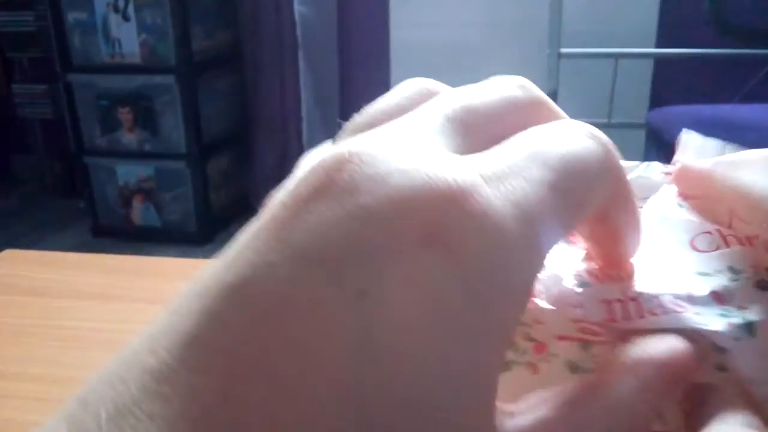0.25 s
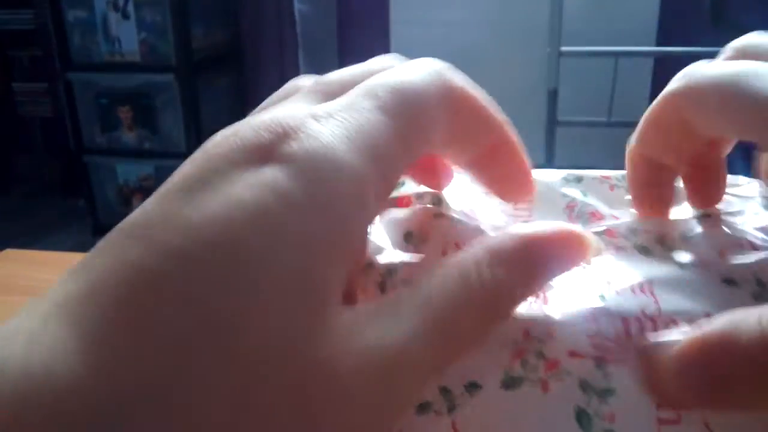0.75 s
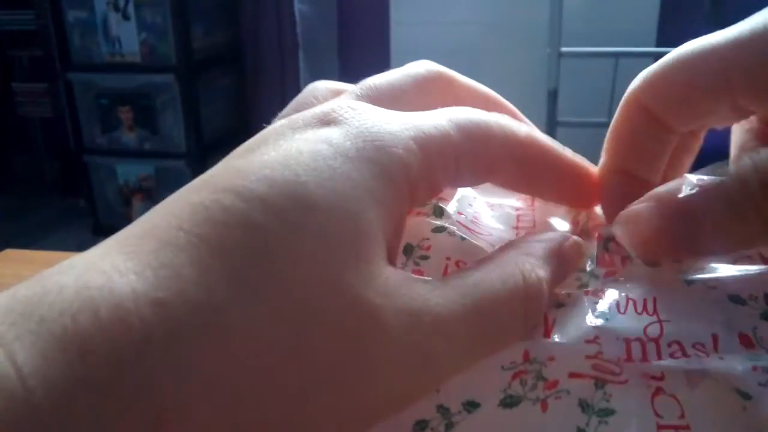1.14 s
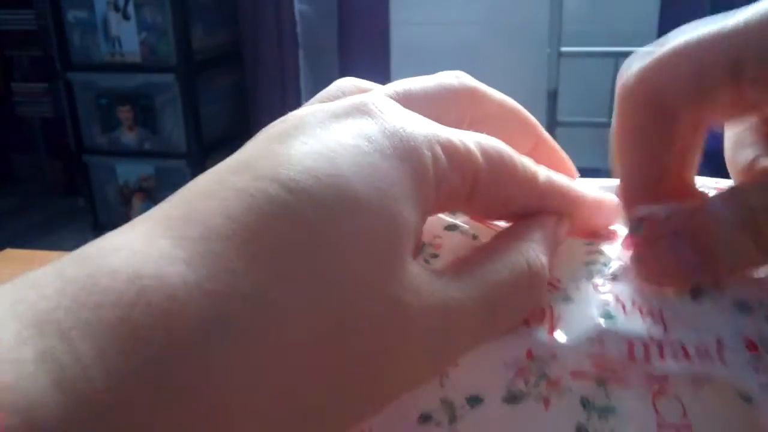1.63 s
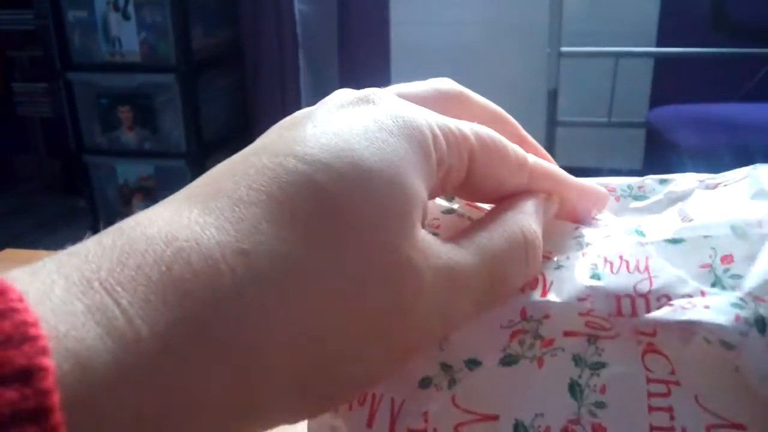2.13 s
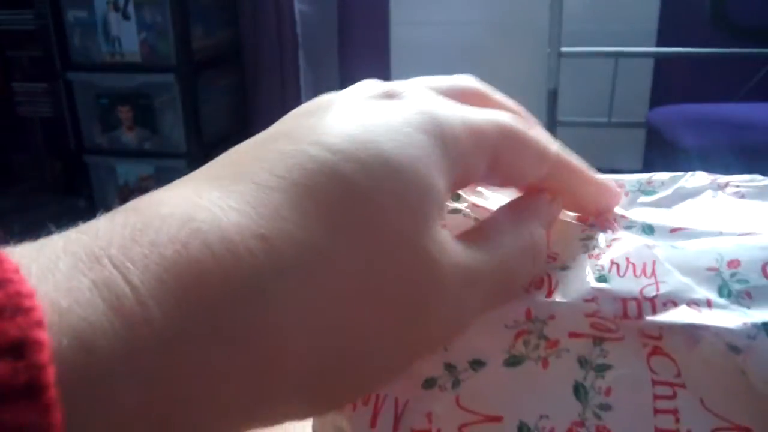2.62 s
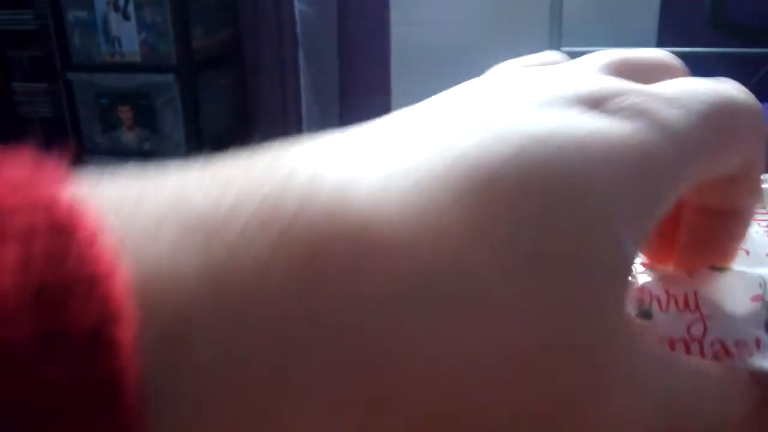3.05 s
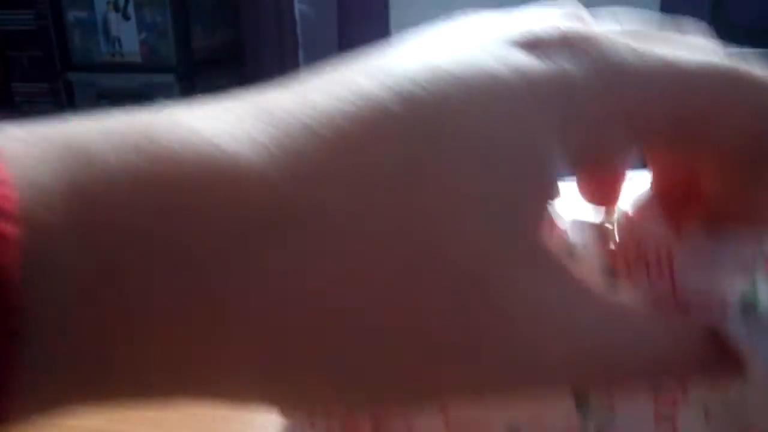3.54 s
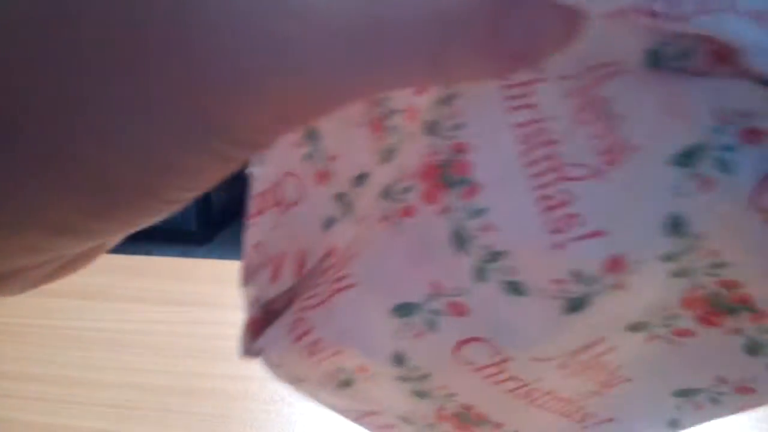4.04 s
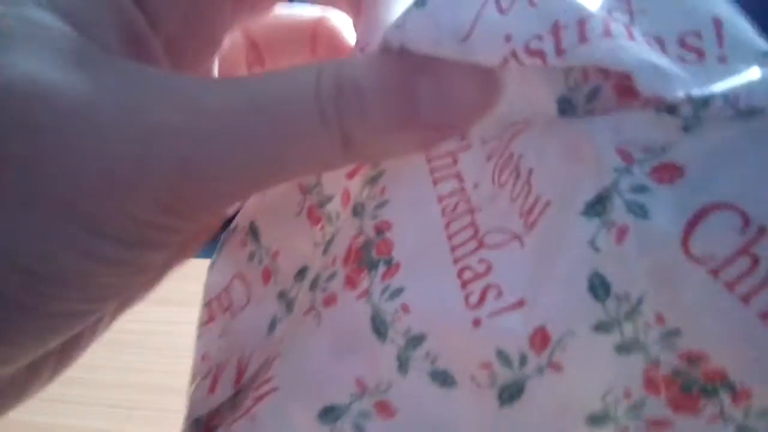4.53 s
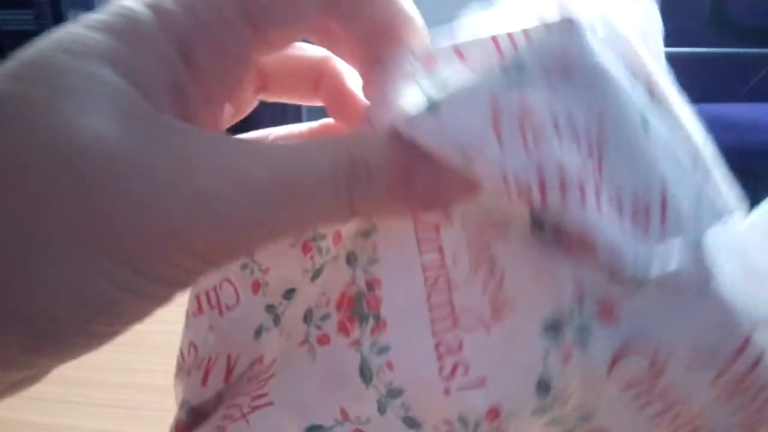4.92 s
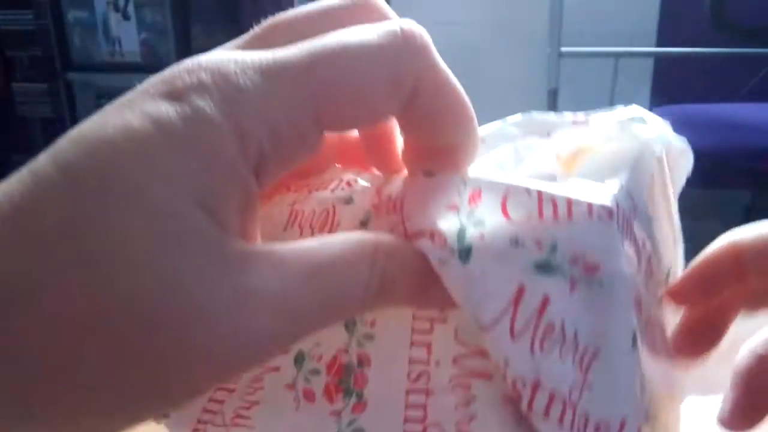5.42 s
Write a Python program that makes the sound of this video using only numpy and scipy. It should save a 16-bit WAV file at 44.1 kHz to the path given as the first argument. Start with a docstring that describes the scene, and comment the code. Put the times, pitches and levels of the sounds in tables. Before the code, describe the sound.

Thin glossy wrapping paper crackles and snaps in picking fingers, swells into loud rasping crinkles as it is pulled open, then fades to faint ticks.

```python
"""Hands pick open a small present in thin glossy wrapping paper, close to the microphone in a furnished room.
Creases snap through in milliseconds: noise bursts and damped sines excite facets, sheet and hollow.
Pulling and peeling crowd tiny buckles into rasping bursts: random impulses set the power of filtered noise.
Fingers bump, tap, drag and slide by shaped noise and decaying sines, over a faint hush of filtered noise.
Scattered echoes follow every sound of the wrap, and the loudest snaps overload the microphone."""
import sys
import numpy as np
from scipy import signal
from scipy.fft import rfft, irfft
from scipy.io import wavfile
from scipy.ndimage import uniform_filter1d

SR = 44100
rng = np.random.default_rng(int(sys.argv[2]) if len(sys.argv) > 2 else 0)


def master(y):
    """Save y as 16-bit WAV."""
    cut = np.clip(np.atleast_2d(y).T, -1, 1)
    pcm = np.round(cut * 32767)  # scale
    wavfile.write(sys.argv[1], SR, pcm.astype(np.int16))


N = 250263
TIME = np.arange(N) / SR


def undb(db):
    """Amplitude law: 20 dB is a tenfold gain."""
    return 10 ** (np.asarray(db) / 20)


def unit(x):
    """Normalisation: scale to rms 1."""
    return x / np.sqrt(np.mean(x ** 2) + 1e-20)


def add(track, s, sound):
    """Superposition: mix a sound into the track from time s."""
    i = int(np.clip(s * SR, 0, N - 1))
    track[i:i + len(sound)] += sound[:N - i]


def response(points, size=2048):
    """Minimum phase: the causal, unit-energy impulse response of a (Hz, dB) spectrum."""
    hz, db = np.transpose(points)
    log_hz = np.log(np.fft.rfftfreq(size, 1 / SR) + 1)
    gain = undb(np.interp(log_hz, np.log(hz), db))
    # folding the cepstrum onto positive times makes the response causal
    cepstrum = irfft(np.log(gain))
    cepstrum[1:size // 2] *= 2
    cepstrum[size // 2 + 1:] = 0
    h = irfft(np.exp(rfft(cepstrum)))[:size // 2]
    return h / np.linalg.norm(h)


def ringing(modes, size=2048):
    """Modal superposition: damped sines, wider modes dying sooner, with unit energy in all."""
    t = np.arange(size) / SR
    h = np.zeros(size)
    for k, (hz, width, db) in enumerate(modes):
        decay = np.exp(-np.pi * width * t)
        sign = (-1) ** k  # neighbours alternate in sign
        h += sign * undb(db) * width * decay * np.sin(2 * np.pi * hz * t)
    return h / np.linalg.norm(h)


def through(x, h):
    """Linear filtering: convolve a sound with an impulse response."""
    return signal.fftconvolve(x, h)[:len(x)]


def burst(decay_s, size=2048):
    """Impulsive excitation: noise that starts at once and decays exponentially."""
    return rng.standard_normal(size) * np.exp(-np.arange(size) / SR / decay_s)


def buckles(rate, spread_db, grain_s, rub, window=1700):
    """Shot noise: power of random, uneven buckles, its local mean held near 1, over smooth rubbing."""
    sizes = undb(spread_db * np.minimum(rng.exponential(size=N), 4))
    hits = (rng.random(N) < rate / SR) * sizes ** 2
    power = signal.lfilter([1], [1, -np.exp(-1 / (grain_s * SR))], hits)
    local = uniform_filter1d(uniform_filter1d(power, size=window), size=window)
    return power / (np.abs(local) + 0.0014 * power.mean()) + rub


# spectrum of the room's hush: frequency_hz, relative_level_db
HUSH_SPECTRUM = [(30, -7.5), (150, 4), (700, -2.5), (2000, 0.5), (6000, -6), (7600, -35.5), (16000, -29)]


def hush():
    """Stationary noise: a steady, coloured background at -65 dB rms."""
    return undb(-65.0) * through(rng.standard_normal(N), response(HUSH_SPECTRUM))


ROOM_T60_S, ROOM_DB = 0.33, -13.5


def room(x, first_s=0.0069, size=22050):
    """Diffuse reverberation: scattered echoes from the table and furniture decay exponentially."""
    t = np.arange(size) / SR
    onset = np.clip(t / first_s - .5, 0, 1)
    tail = rng.standard_normal(size) * undb(-60 * t / ROOM_T60_S) * onset
    colour = response([(100, 0), (700, 3.0), (2000, 2.5), (6200, -1.5), (8500, -5), (16000, -3.5)])
    tail = through(tail, colour)
    return x + undb(ROOM_DB) * through(x, tail / np.linalg.norm(tail))


# spectrum of the parcel's bulk: frequency_hz, relative_level_db
BULK_SPECTRUM = [(30, -24.5), (90, -10), (170, -9.5), (270, 3), (450, 2), (800, -1), (3000, -63.5)]
# fingers bump the parcel: start_s, level_db (peak, before a common gain)
PARCEL_BUMPS = [(0.85, -47), (1.574, -48), (2.54, -27.5), (2.648, -49.5), (2.668, -36), (2.698, -53),
                (2.723, -49), (3.19, -31.5), (3.332, -34), (3.397, -36), (3.434, -25), (3.505, -35),
                (3.722, -34.5), (3.829, -29), (3.861, -44), (5.306, -45.5)]


def bumps():
    """Soft impact: a fingertip's slow-decaying burst excites the low bulk of the parcel."""
    out, bulk = np.zeros(N), response(BULK_SPECTRUM)
    for s, db in PARCEL_BUMPS:
        thud = through(burst(0.0078), bulk)
        add(out, s, undb(db + 3.5) * thud / np.abs(thud).max())
    return out


# fingertips tap the taut wrap: start_s, level_db (before onset and decay), pitch_hz, t60_s
WRAP_TAPS = [(.098, -39.5, 790, 0.027), (.223, -30.5, 670, 0.026), (.808, -25.5, 723, 0.045),
             (.864, -19, 724, 0.029), (.987, -51, 806, .035), (1.014, -10, 1720, 0.0066),
             (3.437, -17, 520, 0.018), (3.722, -25, 671, 0.038), (5.064, -34.5, 728, 0.035),
             (5.221, -40, 1260, 0.033), (5.306, -30, 693, 0.031), (5.574, -39.5, 692, 0.068)]


def taps():
    """Membrane vibration: the drum-tight wrap sounds one damped mode, softened at its onset."""
    out, t = np.zeros(N), np.arange(SR // 8) / SR
    press = 1 - np.exp(-t / 0.00029)
    for s, db, hz, t60 in WRAP_TAPS:
        add(out, s, undb(db - 60 * t / t60) * press * np.sin(2 * np.pi * hz * t))
    return out


def stroke(length, h, edge, grit):
    """Sliding friction: filtered noise, rough with tiny catches, swells and dies away."""
    count = int(length * SR)
    catches = buckles(260, spread_db=0, grain_s=0.0024, rub=0)
    rubbing = through(np.sqrt(1 + grit * catches) * rng.standard_normal(N), h)
    return unit(rubbing[-count:]) * signal.windows.tukey(count, edge)


# spectrum of the shuddering wrap: frequency_hz, relative_level_db
SHUDDER_SPECTRUM = [(30, -14), (70, -16), (115, 0.5), (180, 2.5), (270, 0), (400, -3.5), (800, -37),
                    (3000, -62)]
# the wrap is dragged over the parcel: centre_s, length_s, level_db (rms before the fades)
WRAP_DRAGS = [(0.837, 0.13, -53), (1.006, 0.1, -51.5), (1.91, .16, -53), (2.69, 0.18, -40),
              (3.89, 0.15, -53), (4.25, 0.2, -50), (4.446, 0.19, -52.5), (4.76, 0.21, -55)]


def drags():
    """Rough friction: strong catches make the dragged wrap shudder at low frequencies."""
    out, shudder = np.zeros(N), response(SHUDDER_SPECTRUM)
    for s, length, db in WRAP_DRAGS:
        add(out, s - length / 2, undb(db) * stroke(length, shudder, edge=0.55, grit=1.9))
    return out


# fingertips slide on the glossy face: centre_s, length_s, level_db (rms before the fades), colour_hz
FINGERTIP_SLIDES = [(0.21, 0.23, -45.5, 3200), (0.517, 0.39, -56, 2010), (5.174, 0.061, -52, 3970),
                    (5.444, 0.065, -41.5, 4070)]


def slides():
    """Smooth friction: weak catches leave a whisper with one broad spectral peak."""
    out = np.zeros(N)
    for s, length, db, hz in FINGERTIP_SLIDES:
        colour = response([(hz / 4, -22), (hz / 1.6, -7), (hz, 0), (hz * 1.52, -5), (7000, -28), (9000, -50)])
        add(out, s - length / 2, undb(db) * stroke(length, colour, edge=1, grit=0.29))
    return out


# spectra of small stiff facets, the wider sheet and the finest cracks: frequency_hz, relative_level_db
FACET_SPECTRUM = [(1500, -30.5), (3000, -17.5), (3700, -6), (4900, -3), (5800, -0.5), (6600, -6),
                  (7300, -11.5), (8100, -18), (10000, -48), (16000, -56.5)]
SHEET_SPECTRUM = [(300, -43), (900, -20.5), (1300, -4.5), (2000, 1), (3100, 4.5), (3800, 5), (5500, -49),
                  (12000, -83.5)]
SIZZLE_SPECTRUM = [(4000, -58.5), (7000, 9), (8500, 9), (11000, 4), (15500, -6)]
# modes of the air and paper around the present: pitch_hz, width_hz, relative_level_db
HOLLOW_MODES = [(158, 71, -13.5), (296, 91, -9), (400, 113, -6.5), (560, 113, 1), (750, 151, 2.5),
                (1216, 396, -6.5)]


def paper_responses():
    """Resonance: impulse responses of facets, sheet, fine cracks and hollow colour each excitation."""
    return response(FACET_SPECTRUM), response(SHEET_SPECTRUM), response(SIZZLE_SPECTRUM), ringing(HOLLOW_MODES)


ATTACK_DB_PER_S, RELEASE_DB_PER_S = 1301, 543  # how a move takes hold and lets go
ARCH = 1.12  # exponent that rounds its crest
HOLD_DB = -84  # the wrap creaks faintly while it is only held
# moves of the hands on the wrap: start_s, crest_s, end_s, level_db (at the crest), swell_db,
# contact_db (with the parcel), sizzle_db
HAND_MOVES = [(0.0, .02, 0.25, -54.5, 2, -5, -11), (0.392, 0.444, 0.6, -44.5, 11, 5, -9),
              (0.71, 0.81, 0.9, -39, 9.5, 7.5, -3), (0.975, 0.994, 1.125, -33, 14.5, -1, -2),
              (1.178, 1.23, 1.36, -45.5, 6.5, -2, 0), (1.368, 1.378, 1.52, -40, 17, 12, 11),
              (1.5, 1.579, 1.74, -37.5, 19, 4.5, 3), (1.856, 1.93, 1.974, -26, 2, 4, 7.5),
              (2.067, 2.103, 2.21, -30.5, 2.5, 0.5, 6.5), (2.175, 2.232, 2.31, -12, 6, 3, -2.5),
              (2.308, 2.339, 2.49, -29, 5.5, 2.5, 1.5), (2.498, 2.53, 2.58, -29, -1, 0, 2),
              (2.622, 2.704, 2.73, -12.5, 1.5, 3.5, -4), (2.89, 2.922, 3.01, -38, 6.5, 4.5, -16),
              (3.063, 3.235, 3.3, -35, 6, 1, 1), (3.315, 3.452, 3.575, -29, 2, -0.5, 1),
              (3.58, 3.641, 3.783, -20, 10.5, -0.5, -0.5), (3.818, 3.89, 3.95, -6.5, 10.5, .5, 1),
              (4.146, 4.232, 4.325, -14, 10, -6.5, 0.5), (4.372, 4.416, 4.55, -21.5, 8, -3.5, 4.5),
              (4.683, 4.788, 4.815, -23.5, 7, -4.5, 4), (4.893, 4.908, 4.925, -37.5, 4.5, -4, -11),
              (5.075, 5.12, 5.2, -57.5, 3, -22, -8), (5.32, 5.337, 5.36, -59, 5, 2, -9),
              (5.403, 5.46, 5.8, -54, 8, -0.5, -4), (5.55, 5.601, 5.67, -59.5, 2, 8.5, -7)]


def handling():
    """Energy summation: moves that take hold, crest and let go add as powers; level, contact, sizzle in dB."""
    power = np.full((3, N), undb(HOLD_DB) ** 2)
    for start, crest, end, db, swell_db, contact_db, sizzle_db in HAND_MOVES:
        before = (crest - TIME) / max(crest - start, 1e-3)
        after = (TIME - crest) / max(end - crest, 1e-3)
        away = np.clip(np.maximum(before, after), 0, 1)
        outside_db = ATTACK_DB_PER_S * np.maximum(start - TIME, 0) + RELEASE_DB_PER_S * np.maximum(TIME - end, 0)
        gain = undb(db - swell_db * away ** ARCH - np.minimum(outside_db, 120))
        power += np.outer(undb([0, contact_db, sizzle_db]), gain) ** 2
    level_db, contact_db, sizzle_db = 10 * np.log10(power)
    return level_db, contact_db - level_db, sizzle_db - level_db


# how finely the paper gives way, coarse in picking: time_s, rate_per_s (buckles at zero effort)
BUCKLE_GRAIN = [(0, 1400), (.55, 1030), (.8, 374), (1.8, 310), (1.9, 610), (2.25, 460), (2.4, 260),
                (2.7, 670), (3.0, 256), (3.75, 305.4), (3.88, 600), (4.2, 1200), (4.45, 840), (4.85, 1270),
                (5.6, 790)]


def grain_rate(s):
    """Event density: buckles a second at moderate effort, interpolated in time."""
    return np.interp(s, *np.transpose(BUCKLE_GRAIN))


# each part against the facets: dB at moderate effort, dB per dB of effort; gentle moves sizzle less
FLEX_LAW, HOLLOW_LAW, SIZZLE_LAW = (-6.5, -0.12), (-14.5, -0.41), (-20.5, 0.088)
FLEX_CONTACT = 0.69  # share of the contact with the parcel that also flexes the sheet
# kinds of facet, each partly buckling at its own moments: pitch_hz, width_hz, level_db
FACET_KINDS = [(3730, 1400, -13.5), (4350, 410, -8.5), (5330, 940, -7), (5970, 1600, -3.5),
               (6690, 1100, -6)]
# broad panels of the sheet that partly flex on their own: pitch_hz, width_hz, level_db
SHEET_PANELS = [(1440, 1460, -8), (2320, 690, -8.5), (3190, 560, -5.5)]


def crackle(hands, facets, sheet, sizzle, hollow):
    """Crackling noise: the harder the wrap is pulled, the louder, denser and brighter its buckles."""
    level_db, contact_db, bright_db = hands
    effort = level_db + 30  # dB about a moderate pull
    sheet_db = FLEX_LAW[0] + FLEX_LAW[1] * effort + FLEX_CONTACT * contact_db
    hollow_db = HOLLOW_LAW[0] + HOLLOW_LAW[1] * effort + contact_db
    sizzle_db = SIZZLE_LAW[0] + SIZZLE_LAW[1] * effort + bright_db
    rate = grain_rate(TIME) * undb(.55 * effort)
    shared = buckles(rate, spread_db=4.5, grain_s=0.00066, rub=0.014)

    def part(h, own, sparse):
        """Partial coherence: buckles of the whole sheet and sparser ones of its own shake one part."""
        separate = buckles(sparse * rate, spread_db=5.5, grain_s=0.00096, rub=0.012)
        power = (1 - own) * shared + own * separate
        return through(np.sqrt(power) * rng.standard_normal(N), h / np.linalg.norm(h))

    crisp, flex = np.zeros(N), np.zeros(N)
    for hz, width, db in FACET_KINDS:
        stiff_db = 0.08 * effort * np.log2(hz / 5400)  # small, high facets need more force to flip
        facet = through(facets, ringing([(hz, width, 0)]))
        crisp += undb(db + stiff_db) * part(facet, own=0.41, sparse=.35)
    for hz, width, db in SHEET_PANELS:
        panel = through(sheet, ringing([(hz, width, 0)]))
        flex += undb(db) * part(panel, own=0.48, sparse=0.28)
    body = undb(hollow_db) * part(hollow, own=0.63, sparse=.18)
    fine = undb(sizzle_db) * part(sizzle, own=0.091, sparse=0.71)
    return undb(level_db) * (crisp + undb(sheet_db) * flex + body + fine)


LESSER_PER_S, LESSER_HZ, LESSER_DETUNE = 30, 5340, .15  # mean rate, centre ring, scatter of log pitch
LESSER_DB, LESSER_SPREAD_DB, LESSER_MAX_DB = 17.5, 4, -8.5  # peak over the crackle, its scatter and limit
LESSER_GRAIN_DB = -5  # per doubling of the grain's rate: smooth pulls flip only small creases
LESSER_FLEX_DB, LESSER_HOLLOW_DB, LESSER_COLOUR_DB = -22.5, -35, 4.5  # parts against the peak; their scatter


def lesser_creases(level_db, count=300):
    """Clustered random events: rows for snaps() whose strength follows the pull on the wrap."""
    gaps, size, pitch, flex, depth = np.transpose(rng.standard_normal((count, 5)))
    s = np.cumsum(gaps ** 2) / LESSER_PER_S  # squared normal gaps come in clusters
    fine = np.log2(grain_rate(s) / 400)
    db = np.interp(s, TIME, level_db) + LESSER_DB + LESSER_GRAIN_DB * fine + LESSER_SPREAD_DB * size
    db = np.minimum(db, LESSER_MAX_DB)
    hz = LESSER_HZ * np.exp(LESSER_DETUNE * pitch)
    flex_db = db + LESSER_FLEX_DB + LESSER_COLOUR_DB * flex
    hollow_db = db + LESSER_HOLLOW_DB + LESSER_COLOUR_DB * depth
    return np.transpose([s, db, hz, flex_db, hollow_db])[s < TIME[-1]]


SNAP_CREST_DB = 11.5  # nominal peak over the body
SNAP_FLEX_DB, SNAP_HOLLOW_DB = 2, 1  # gains of the sheet's flexing and the hollow's answer
# creases that snap through: start_s, peak_db (nominal), ring_hz (of the facet),
# flex_db (of the sheet, before its gain), hollow_db (its answer, before its gain)
CREASE_SNAPS = [(0.004, -5.5, 4070, -28.5, -42.5), (0.064, -21.5, 5430, -33, -64),
                (0.353, -37, 4170, -44.5, -65), (0.416, -20.5, 6400, -51, -63),
                (0.458, -13.5, 4500, -30, -34.5), (0.583, -19.5, 5630, -49, -36.5),
                (0.699, -22.5, 6000, -41, -46), (0.724, -4, 5600, -37, -36.5),
                (0.789, -5, 5960, -27.5, -45), (0.845, -6.5, 5480, -30.5, -31),
                (0.848, -7, 4600, -29, -34.5), (0.863, -5, 5800, -24.5, -31),
                (0.987, -16, 6200, -31.5, -33), (1.012, -8.5, 6440, -33, -35), (1.037, -12, 5600, -41, -49),
                (1.08, -12, 5370, -33, -57), (1.178, -13.5, 4350, -33, -46), (1.184, -9.5, 4960, -36, -46),
                (1.198, -18, 5210, -36.5, -42), (1.228, -12.5, 6400, -38, -44.5),
                (1.309, -15.5, 5960, -36, -38.5), (1.38, -16, 4830, -29.5, -34),
                (1.39, -12.5, 5200, -29, -34), (1.406, -10.5, 5960, -32.5, -37.5),
                (1.462, -8, 4100, -29.5, -37.5), (1.499, -9.5, 5540, -26, -34), (1.527, -6, 5620, -29, -36),
                (1.545, -2.5, 6230, -24, -28.5), (1.576, -4.5, 5940, -23.5, -22.5),
                (1.594, -4.5, 4960, -25.5, -47), (1.617, -4.5, 4140, -23, -40),
                (1.706, -10, 5130, -26, -35), (1.792, -22, 3330, -32.5, -48.5),
                (1.905, -7, 5000, -28.5, -35), (1.954, 2, 5110, -25.5, -28.5),
                (2.087, -4, 6100, -34, -48.5), (2.136, -12, 5850, -28.5, -39.5),
                (2.185, -1.5, 5760, -19.5, -47), (2.366, -5, 5300, -27, -34), (2.377, -5.5, 5400, -24, -49),
                (2.418, -10, 3660, -27, -39), (2.428, -3.5, 5820, -31, -30.5), (2.537, 1, 5700, -21, -27.5),
                (2.695, 5, 5640, -28, -33.5), (2.888, -14, 5209, -30.5, -44), (2.894, -3.5, 5460, -34, -47),
                (2.955, -19, 5140, -36.5, -37), (3.038, -11, 5550, -30.5, -44), (3.077, -2, 5780, -26, -34),
                (3.16, -1, 5700, -28.5, -34.5), (3.167, -8, 5750, -29.5, -41),
                (3.186, -5, 4430, -24.5, -29), (3.208, -4, 5030, -26.5, -34),
                (3.257, -5.5, 5330, -37, -36.5), (3.327, 0.5, 6120, -16, -21),
                (3.336, -3.5, 5360, -24, -26), (3.396, 6.5, 4370, -13, -25), (3.411, -6, 6000, -29, -24.5),
                (3.445, -5, 5900, -29, -33), (3.483, -10, 5580, -31, -27.5),
                (3.504, -3, 5280, -22.5, -20.5), (3.53, -6.5, 5260, -22, -34),
                (3.563, -1.5, 6060, -22.5, -33.5), (3.567, -3.5, 5580, -26, -30.5),
                (3.616, -7.5, 5850, -25, -29), (3.656, -1.5, 6150, -27, -33), (3.72, -12, 6020, -33.5, -34),
                (3.816, -6, 4500, -26, -28), (3.827, 1.5, 4270, -18, -35), (4.102, -8, 5800, -28, -64),
                (4.109, -20, 6050, -35, -66.5), (4.15, -7, 6600, -39, -48), (4.678, -5, 4400, -32.5, -56),
                (4.81, -5.5, 5100, -36, -39), (4.95, -24, 5730, -46, -50.5),
                (5.062, -11.5, 4810, -35, -38.5), (5.218, -27, 5348, -55, -70),
                (5.306, -21.5, 5240, -34, -32), (5.499, -31, 4380, -47, -54), (5.581, -29, 4600, -43, -44),
                (5.598, -25.5, 6300, -44, -46)]


def snaps(creases, facets, sheet, sizzle, hollow):
    """Snap-through buckling: the facet rings for a millisecond, the sheet flexes and the hollow answers."""
    out, t = np.zeros(N), np.arange(2048) / SR
    spread = np.sqrt(.003 * SR / len(t))  # refers rms levels to 3 ms
    for s, peak_db, hz, flex_db, answer_db in creases:
        db = peak_db - SNAP_CREST_DB
        hollow_db = answer_db + SNAP_HOLLOW_DB - db
        sheet_db = flex_db + SNAP_FLEX_DB - db
        ring = t * np.exp(-t / 0.00044) * np.sin(2 * np.pi * hz * t)
        shiver = undb(-15.5) * unit(burst(0.0014))  # the paper around the crease trembles on
        crack = unit(burst(0.0015)) + shiver
        tick = 1.13 * unit(through(ring, facets)) + unit(through(crack, facets))
        # gentle snaps are dull; hard snaps of small, high facets have a sharp edge
        top_hz = np.clip(7800 * undb(0.065 * (db + 12)), 5000, 15000)
        tick = unit(signal.sosfilt(signal.butter(8, top_hz, fs=SR, output="sos"), tick))
        edge_db = -24.5 + 0.42 * (db + 21.0) + 6.3 * np.log2(hz / 5400)
        edge = undb(edge_db) * unit(through(burst(0.00055), sizzle))
        flex = undb(sheet_db) * unit(through(unit(burst(0.0019)) + shiver, sheet))
        pop = undb(hollow_db) * unit(through(burst(0.0022), hollow))
        add(out, s, undb(db) * spread * (tick + flex + pop + edge))
    return out


def scene():
    """Superposition: the wrap and the parcel sound together in a quiet room."""
    paper = paper_responses()
    hands = handling()
    touches = bumps() + taps() + drags() + slides()
    lesser = snaps(lesser_creases(hands[0]), *paper)
    wrap = crackle(hands, *paper) + snaps(CREASE_SNAPS, *paper) + lesser
    return (room(wrap + touches) + hush())[None]


TOP_HZ = 15750


def record(dry, ceiling=1.0):
    """Saturation and band limiting: the microphone flattens the tallest peaks and cuts the top."""
    rounded = dry / (1 + (dry / ceiling) ** 4) ** (1 / 4)
    return signal.sosfilt(signal.ellip(8, .2, 70, TOP_HZ, fs=SR, output="sos"), rounded)


dry = scene()
out = record(dry)
master(out)
```